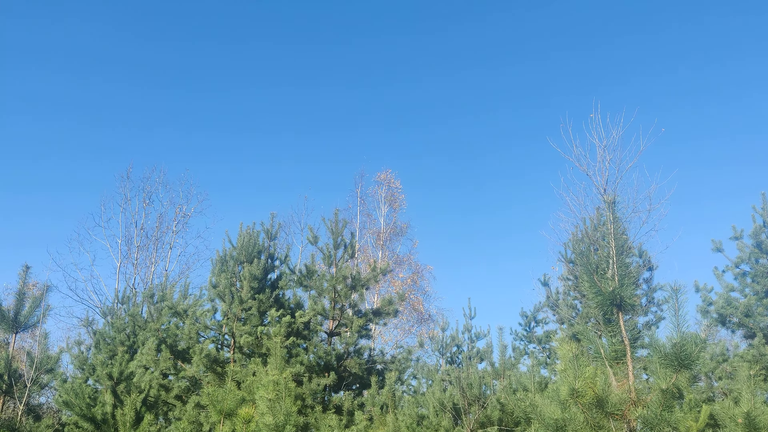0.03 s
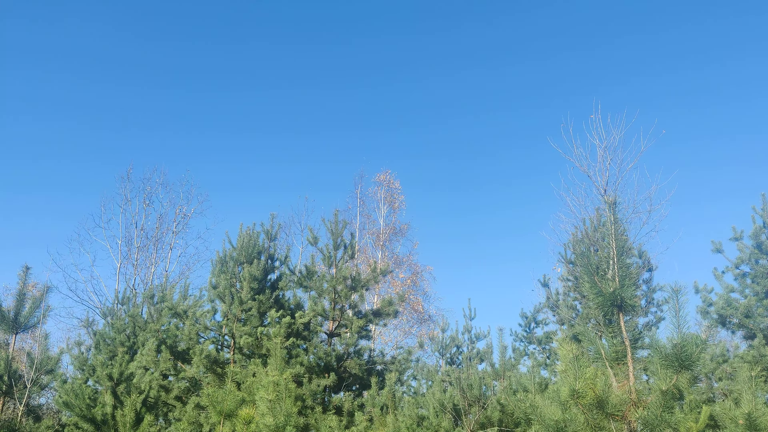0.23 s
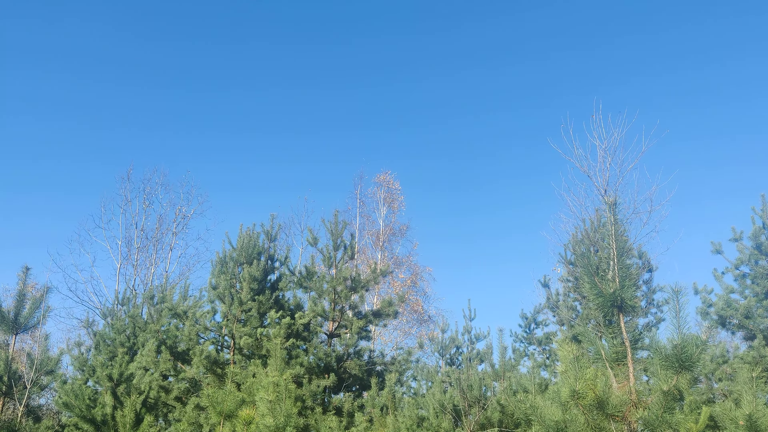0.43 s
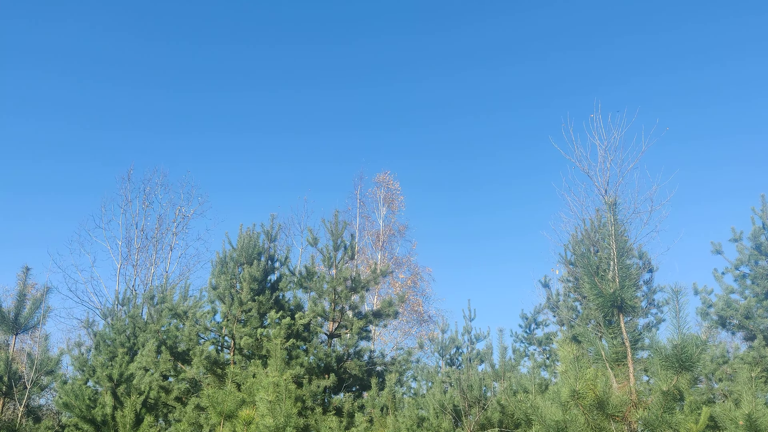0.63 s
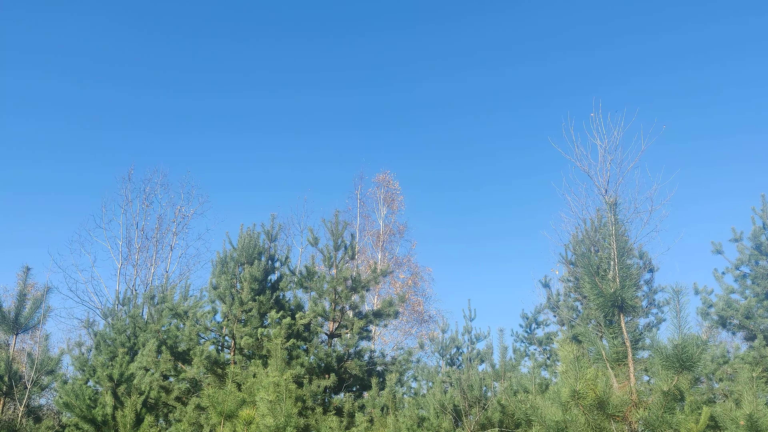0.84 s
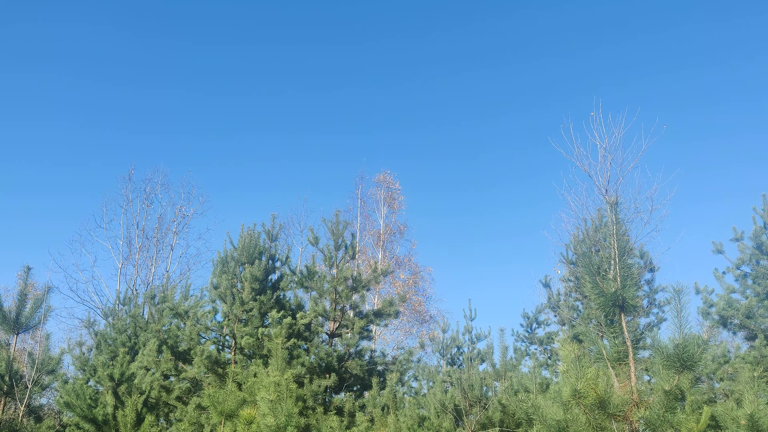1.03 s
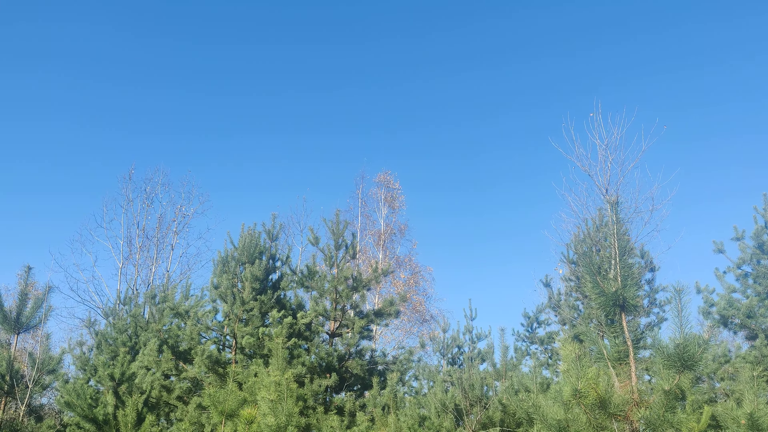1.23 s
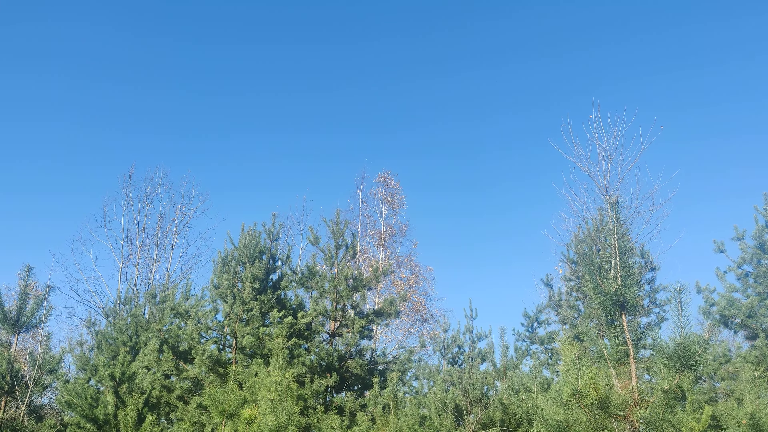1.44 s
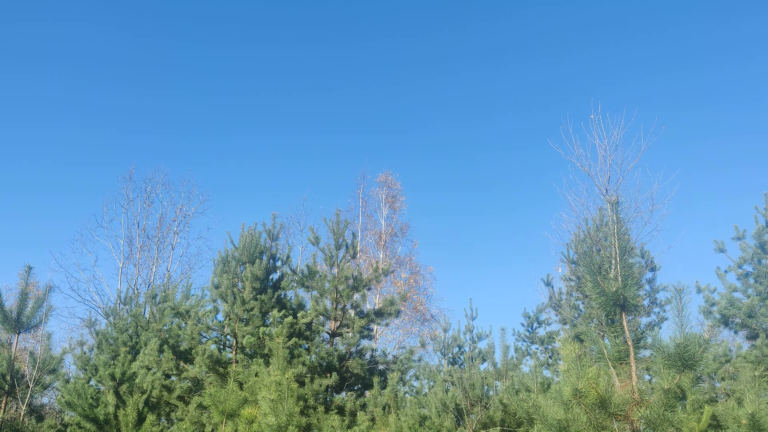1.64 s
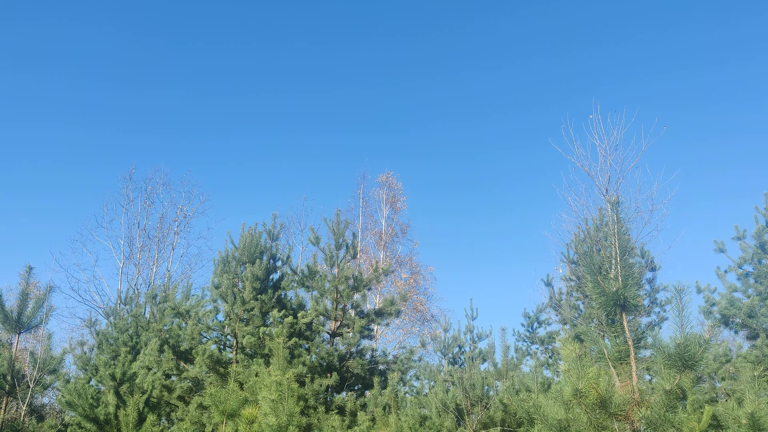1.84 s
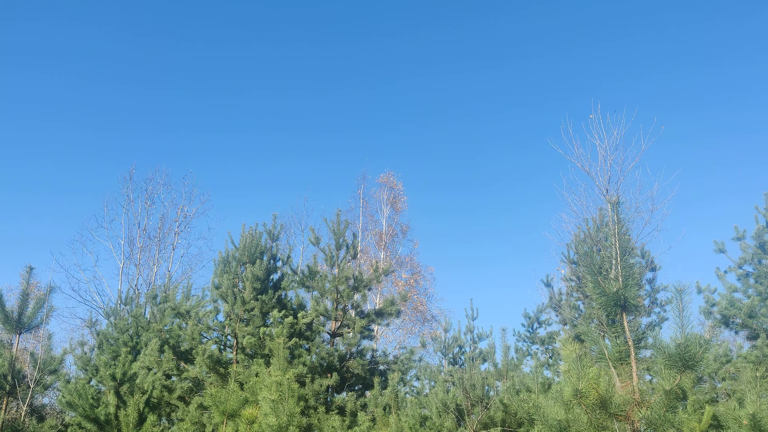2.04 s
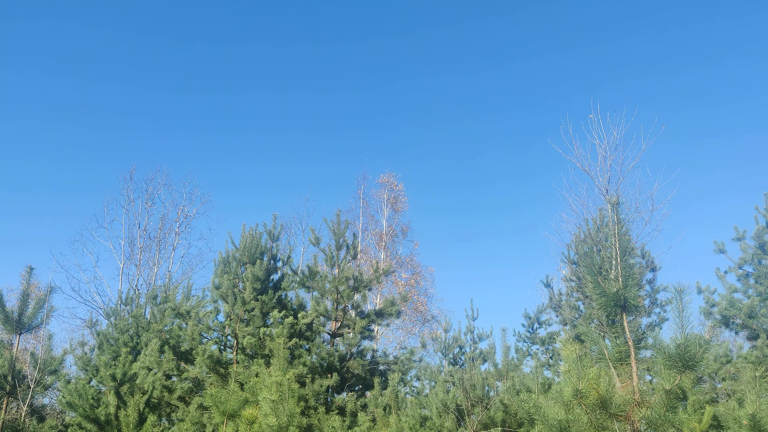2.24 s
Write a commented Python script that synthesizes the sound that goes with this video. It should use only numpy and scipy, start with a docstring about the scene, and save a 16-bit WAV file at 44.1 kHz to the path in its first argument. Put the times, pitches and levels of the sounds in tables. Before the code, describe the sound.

Low gusty wind buffets the microphone, with soft tree hiss and tiny dry ticks behind

```python
"""Gusty wind at a pine wood

Gusty wind buffets the two ports of a microphone at the edge of a young pine wood. Each port has its own
noise: a deep rumble, a flutter that grows faster than the flow, and thumps where tight eddies hit it.
Behind it a breeze hisses in the trees (drifting noise), needles rustle to the right (grainy noise) and a few
faint dry ticks sound (tiny noise bursts). Midway the whole level sinks, then snaps back."""
import sys
import numpy as np
from scipy import signal
from scipy.fft import rfft, irfft, next_fast_len
from scipy.io import wavfile
from scipy.ndimage import uniform_filter1d, map_coordinates

SR = 44100
rng = np.random.default_rng(int(sys.argv[2]) if len(sys.argv) > 2 else 0)


def inscribe(sig):
    """Save sig as 16-bit PCM at rate SR to the path in sys.argv[1].

    A 1-D sig is mono; a 2-D sig holds one channel per row.
    Samples are clipped to [-1, 1] before scaling.
    """
    pcm = np.round(np.clip(np.atleast_2d(sig).T, -1, 1) * 32767)
    wavfile.write(sys.argv[1], SR, pcm.astype(np.int16))


N = 101429

# strength of the wind on each port: time_s, flow_db
LEFT_FLOW = [(0.0, -38.5), (0.18, -48.5), (0.21, -12), (0.24, -14), (0.31, -31.5), (0.33, -25.5),
             (0.42, -20.5), (0.49, -33), (0.55, -26.8), (0.61, -45), (0.73, -43.5), (0.79, -35),
             (0.85, -39.4), (0.99, -33.5), (1.02, -52.5), (1.16, -39.5), (1.23, -55), (1.5, -46.5),
             (1.54, -37), (1.62, -52), (1.68, -48), (1.71, -35), (1.98, -25), (2.02, -31), (2.11, -31),
             (2.17, -39), (2.2, -36.5), (2.3, -40.5)]
RIGHT_FLOW = [(0.0, -36.5), (0.07, -45.5), (0.12, -41), (0.15, -25.5), (0.39, -47.5), (0.43, -32),
              (0.46, -39.5), (0.54, -28.5), (0.57, -43), (0.64, -26), (0.79, -48.5), (0.85, -28),
              (1.0, -44.5), (1.05, -37), (1.11, -48.9), (1.35, -52), (1.5, -41.5), (1.54, -27.0),
              (1.63, -31.5), (1.68, -56.5), (1.72, -26.5), (1.78, -42.5), (1.84, -28), (1.87, -38.5),
              (1.95, -29.5), (2.02, -42), (2.17, -38.5), (2.3, -46.5)]

# colour of the slow and the fast turbulence at the ports: frequency_hz, relative_db_per_hz
RUMBLE_COLOUR = [(6, -5.5), (25, 2.5), (58, -3), (76, -12.5), (105, -19), (160, -59), (300, -62),
                 (600, -110)]
FLUTTER_COLOUR = [(40, -17), (75, -11), (100, 0.5), (130, -4), (165, -7.5), (220, -19.5), (320, -29.5),
                  (700, -65), (2000, -110)]
RUMBLE_DB, FLUTTER_DB = 1.5, -21.5  # added to the flow level
FLUTTER_GROWTH = 1.42  # dB of flutter for each dB of flow
USUAL_FLOW_DB = -30.5  # the flow level that growth is counted from

# colour of the breeze in the trees: frequency_hz, relative_db_per_hz
TREES_COLOUR = [(30, 8), (120, 6.5), (250, 1), (400, 1), (520, 1.5), (660, 3.5), (850, -1), (1250, -3),
                (1900, -8.5), (2600, -13), (3300, -11.5), (4300, -15.5), (5300, -13), (6400, -15),
                (7400, -20.5), (9500, -20.5), (11500, -21.5), (15500, -22)]
# how alike the two ports hear the trees: frequency_hz, coherence (1 same, 0 unrelated, -1 opposite)
TREES_ALIKE = [(60, 1), (270, 0.9), (450, 0.48), (740, -0.2), (1220, -0.63), (2000, -0.072), (2600, 0.24),
               (3500, 0.028), (15000, -0.068)]
# which side the trees lean to: frequency_hz, left_minus_right_db
TREES_LEAN = [(300, 0), (1200, 0), (2400, -1), (3500, 3.5), (6000, 1.8), (8000, .6), (15000, .6)]
TREES_DB = -54.5

# colour of needles and twigs rustling close by, to the right: frequency_hz, relative_db_per_hz
NEEDLES_COLOUR = [(700, -4), (1800, -5.5), (3300, -13), (6200, -14.5), (7500, -27), (15000, -23)]
NEEDLES_DB, NEEDLES_ROUGH_DB = -68.5, 5  # loudness, and size of its random swings
NEEDLES_LAG_S = 0.00041  # the left port hears them this much later

# dry twig ticks: start_s, level_db, pitch_hz
TICKS = [(.014, -55, 5340), (0.058, -61, 5170), (0.179, -51.5, 5240), (1.326, -54, 5600),
         (1.664, -54.5, 6100), (1.728, -56, 3340), (1.783, -59, 4450)]
TICK_T60_S = 0.01  # time to fall by 60 dB
TICK_WIDTH_OCTAVES = 0.29

# tight eddies that hit one port: centre_s, peak_db, centre_hz, channel (0 left, 1 right)
EDDIES = [(0.168, -31, 93.5, 1), (0.21, -26.5, 91, 1), (0.224, -12.5, 110.7, 0), (0.251, -23.5, 104, 0),
          (0.361, -26, 78.6, 0), (.39, -20, 94.5, 0), (0.633, -24.5, 126, 1), (0.852, -28.5, 99, 1),
          (1.046, -34.5, 87, 1), (1.734, -25, 80, 1), (1.841, -32, 104, 0), (1.895, -25, 119.6, 0),
          (2.003, -27, 97, 0), (2.108, -26, 71, 0)]
EDDY_STEEPNESS = 7.34  # higher = more cycles and a faster fall of the upper frequencies

DIP_START_S, DIP_END_S, DIP_RETURN_S = 1.034, 1.505, 0.009
DIP_DB = -8.5  # at its deepest
DIP_BEND = 1.06  # above 1 the level sinks slowly at first, then faster
TOP_HZ = 15750


def amp(db):
    """Turn decibels into gain."""
    return 10 ** (np.asarray(db) / 20)


def unit(x):
    """Scale to an rms (average strength) of 1."""
    return x / np.sqrt(np.mean(x ** 2) + 1e-20)


def along(points, hz):
    """Read a (frequency, value) table at any frequency, on a log axis."""
    f, value = np.transpose(points)
    return np.interp(np.log(hz + 1), np.log(f + 1), value)


def seconds():
    """Give the time of every sample."""
    return np.arange(N) / SR


def wobble(rate):
    """Draw a smooth curve through random points, rate points a second."""
    points = rng.standard_normal(4096)
    return map_coordinates(points, [seconds() * rate], mode="wrap")


def filtered(x, response):
    """Multiply the spectrum of x by a response that depends on frequency."""
    size = next_fast_len(N + SR // 2)  # spare room so that the end does not wrap onto the start
    hz = np.fft.rfftfreq(size, 1 / SR)
    return irfft(rfft(x, size) * response(hz), size)[..., :N]


def noise(colour):
    """Make noise of rms 1 with the given colour."""
    return unit(filtered(rng.standard_normal(N), lambda hz: amp(along(colour, hz))))


def turbulence(colour, size):
    """Make noise of even strength over size samples, so that the flow alone sets its swells."""
    x = noise(colour)
    power = uniform_filter1d(uniform_filter1d(x ** 2, size), size)
    return unit(x / np.sqrt(np.abs(power) + 1e-3))


def port(flow):
    """Wind on one port: a deep rumble, and a flutter that grows faster than the flow."""
    flow_db = uniform_filter1d(np.interp(seconds(), *np.transpose(flow)), size=600)
    flutter_db = USUAL_FLOW_DB + FLUTTER_GROWTH * (flow_db - USUAL_FLOW_DB)
    rumble = amp(flow_db + RUMBLE_DB) * turbulence(RUMBLE_COLOUR, size=1300)
    flutter = amp(flutter_db + FLUTTER_DB) * turbulence(FLUTTER_COLOUR, size=1200)
    return rumble + flutter


def trees(patchy_db=0.86, sway_db=0.23):
    """The wide, soft hiss of the wood: noise whose strength drifts in patches of time and pitch."""
    grid = signal.stft(rng.standard_normal((2, N)), nperseg=512)[2]
    patches = rng.standard_normal(grid.shape[1:])
    patches = uniform_filter1d(patches, size=8, axis=0)  # smooth across pitch
    patches = uniform_filter1d(patches, size=12, axis=1)  # smooth across time
    pair = signal.istft(grid * amp(patchy_db * unit(patches)), nperseg=512)[1][:, :N]

    def mid_and_side(hz):
        """Share the colour between what the ports have in common and what sets them apart."""
        turn = np.arccos(np.clip(along(TREES_ALIKE, hz), -1, 1)) / 2
        return amp(along(TREES_COLOUR, hz)) * [np.cos(turn), np.sin(turn)]

    mid, side = filtered(pair, mid_and_side)
    left_right = np.array([mid + side, mid - side])
    hiss = filtered(left_right, lambda hz: amp(np.outer([0.5, -0.5], along(TREES_LEAN, hz))))
    return amp(TREES_DB + sway_db * wobble(12.15)) * unit(hiss)


def needles():
    """A grainy rustle that reaches the right port first."""
    rustle = unit(noise(NEEDLES_COLOUR) * amp(NEEDLES_ROUGH_DB * wobble(170)))
    # half the lag delays the left port, the other half advances the right one
    shift = lambda hz: np.exp(1j * np.pi * NEEDLES_LAG_S * np.outer([-1, 1], hz))
    return amp(NEEDLES_DB) * filtered(rustle, shift)


def ticks():
    """Dry twig ticks: tiny bursts of narrow noise that die at once."""
    out = np.zeros((2, N))
    for start_s, level_db, pitch_hz in TICKS:
        t = seconds() - start_s
        octaves_off = lambda hz: np.log2((hz + 1) / pitch_hz)
        bell = lambda hz: np.exp(-0.5 * (octaves_off(hz) / TICK_WIDTH_OCTAVES) ** 2)
        band = unit(filtered(rng.standard_normal((2, N)), bell))
        fade = (t >= 0) * np.exp(-np.log(1000) * np.abs(t) / TICK_T60_S)
        out += amp(level_db) * band * fade
    return out


def eddies():
    """Each eddy is a quick push and pull of pressure on one port, sharpest as its core passes."""
    out = np.zeros((2, N))
    turns = rng.random(len(EDDIES))  # where in its push and pull each eddy is at its centre
    for (centre_s, peak_db, centre_hz, channel), turn in zip(EDDIES, turns):
        passage = 2 * np.pi * centre_hz * (seconds() - centre_s) / EDDY_STEEPNESS
        swirl = np.exp(2j * np.pi * turn) / (1 - 1j * passage) ** (EDDY_STEEPNESS + 1)
        out[int(round(channel))] += amp(peak_db) * np.real(swirl)
    return out


def scene():
    """Wind on both ports over the sound of the wood."""
    wind = np.array([port(LEFT_FLOW), port(RIGHT_FLOW)])
    return wind + trees() + needles() + ticks() + eddies()


def record(dry):
    """The level sinks slowly and snaps back; nothing is kept above the band limit."""
    corners_s = [DIP_START_S, DIP_END_S, DIP_END_S + DIP_RETURN_S]
    depth = np.interp(seconds(), corners_s, [0, 1, 0])
    dipped = dry * amp(DIP_DB * depth ** DIP_BEND)
    return filtered(dipped, lambda hz: hz < TOP_HZ)


dry = scene()
out = record(dry)
inscribe(out)
```